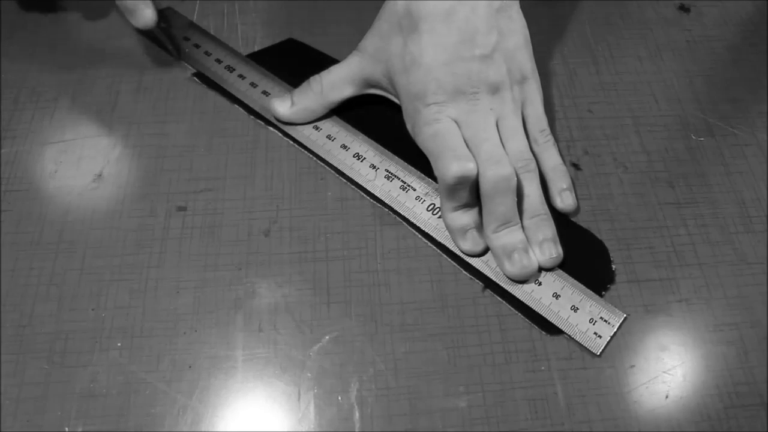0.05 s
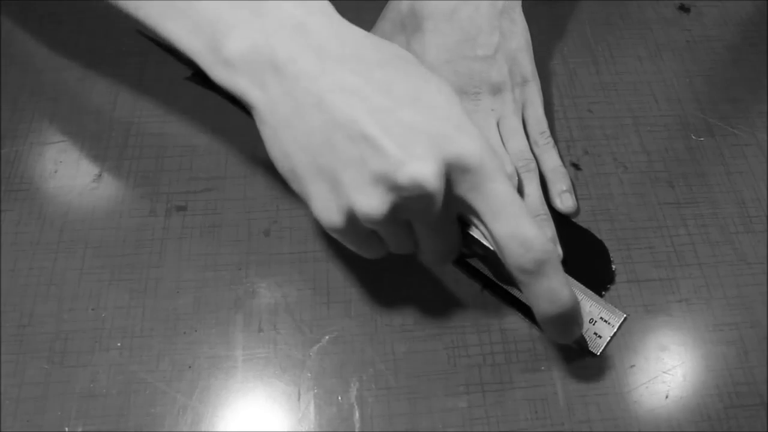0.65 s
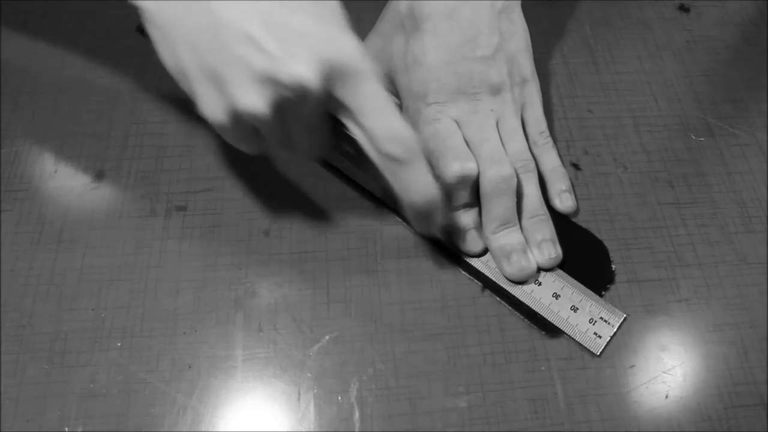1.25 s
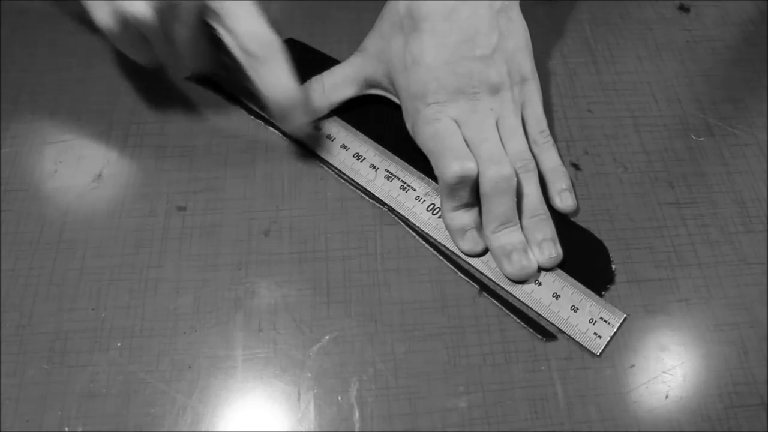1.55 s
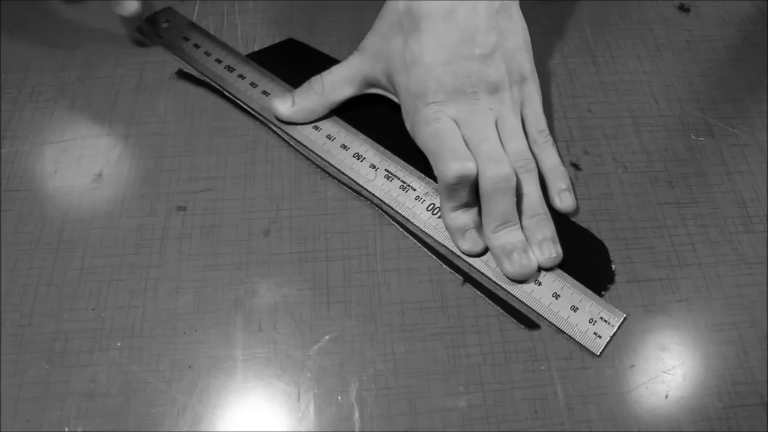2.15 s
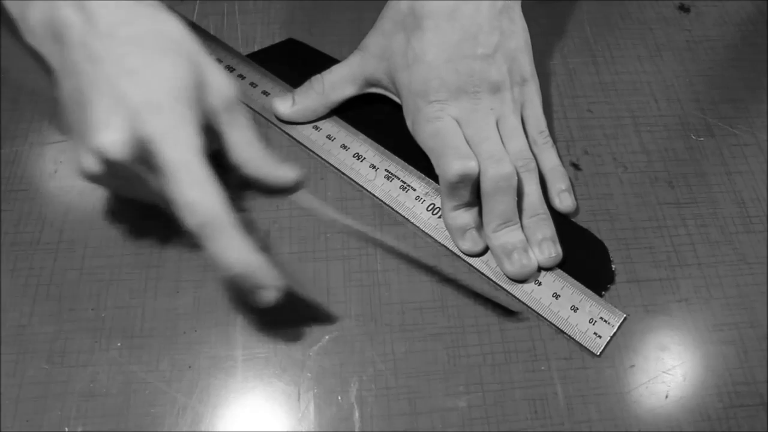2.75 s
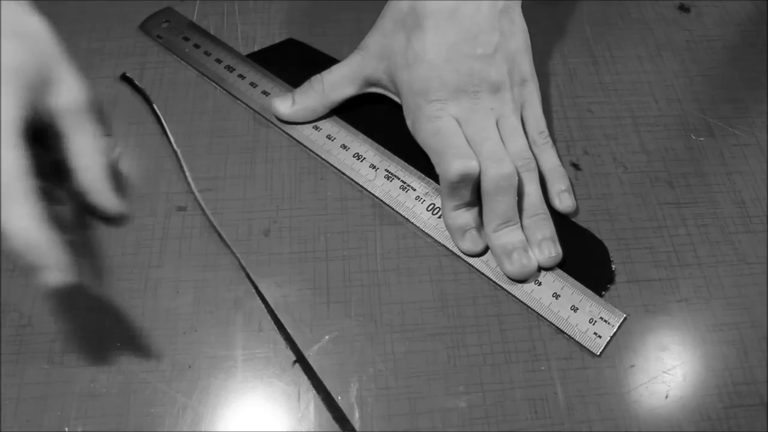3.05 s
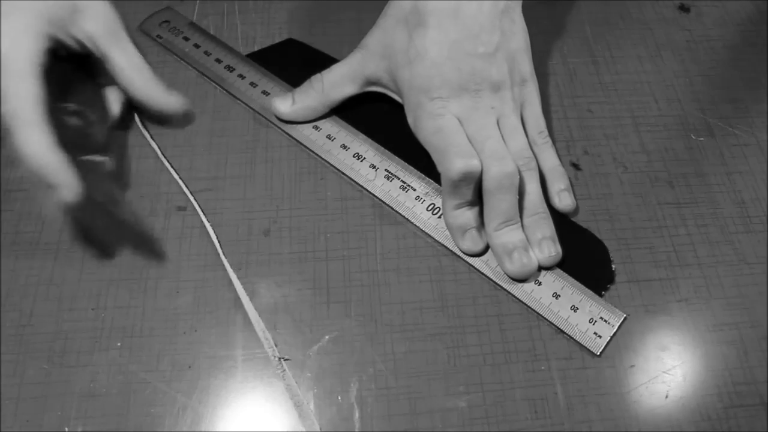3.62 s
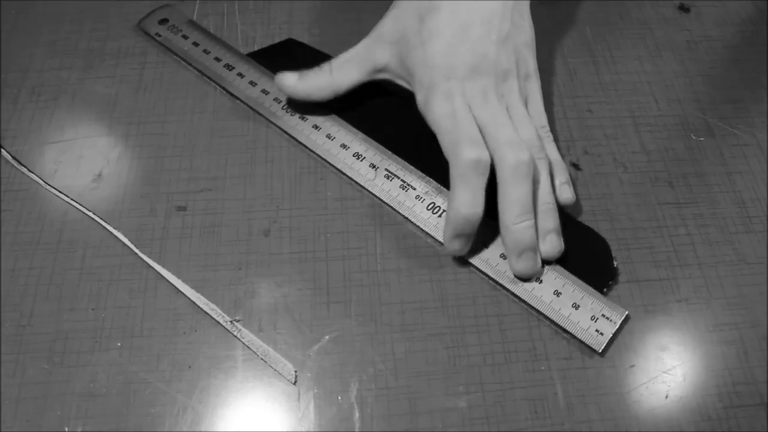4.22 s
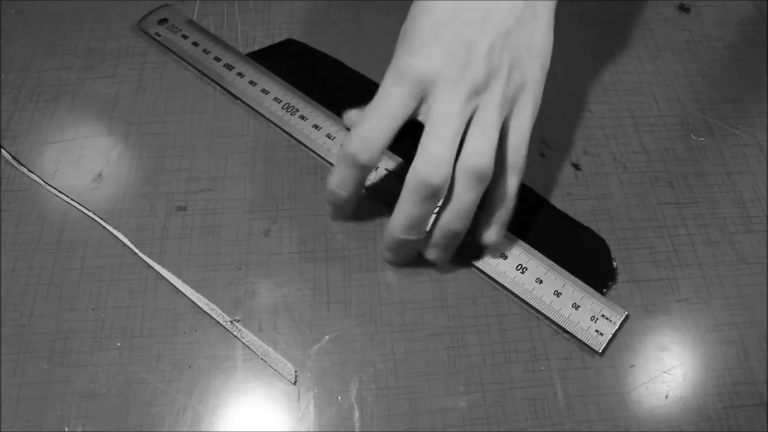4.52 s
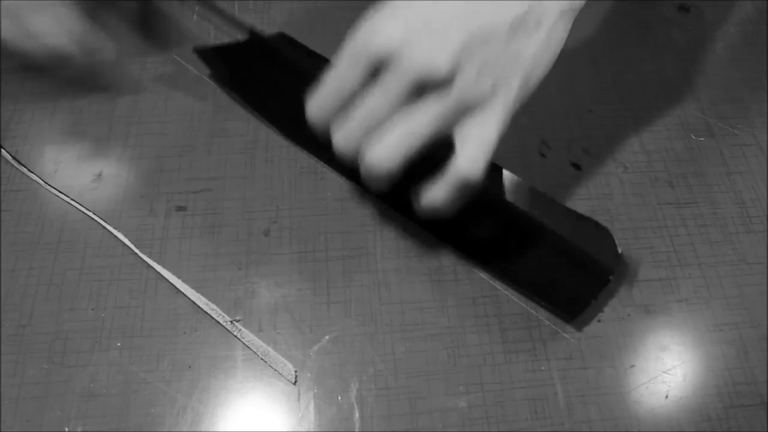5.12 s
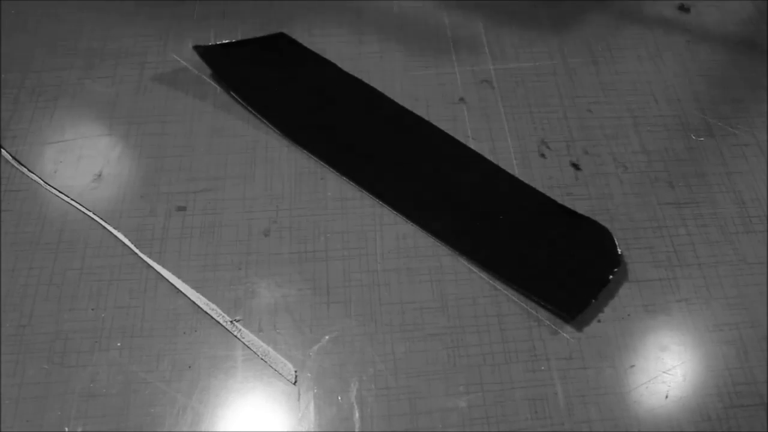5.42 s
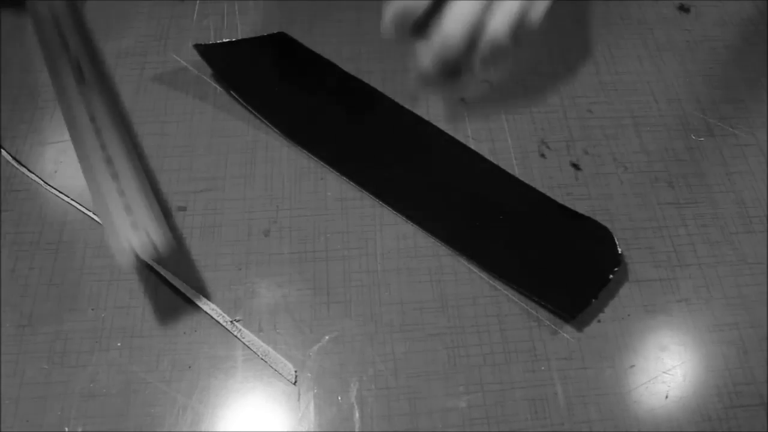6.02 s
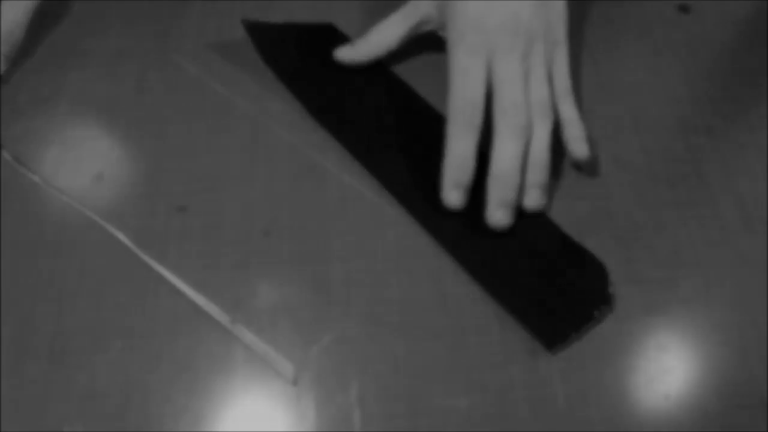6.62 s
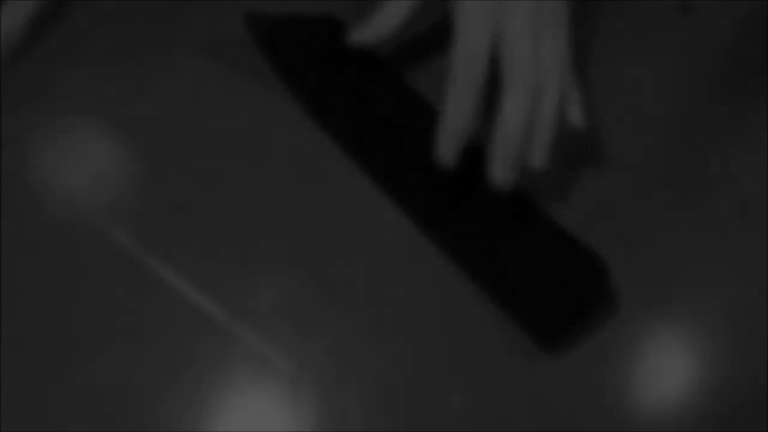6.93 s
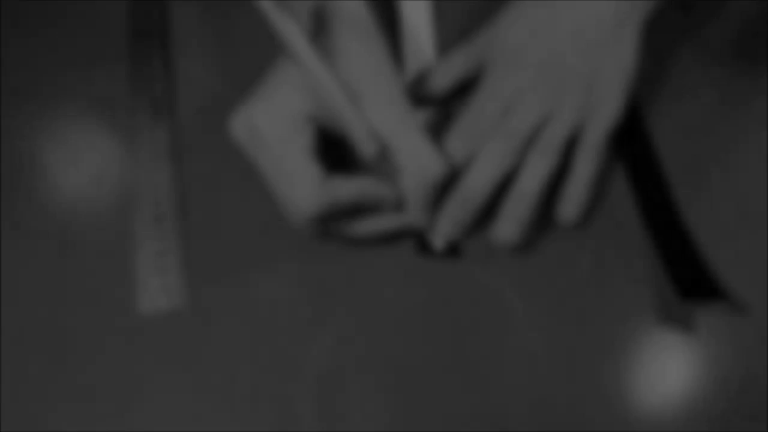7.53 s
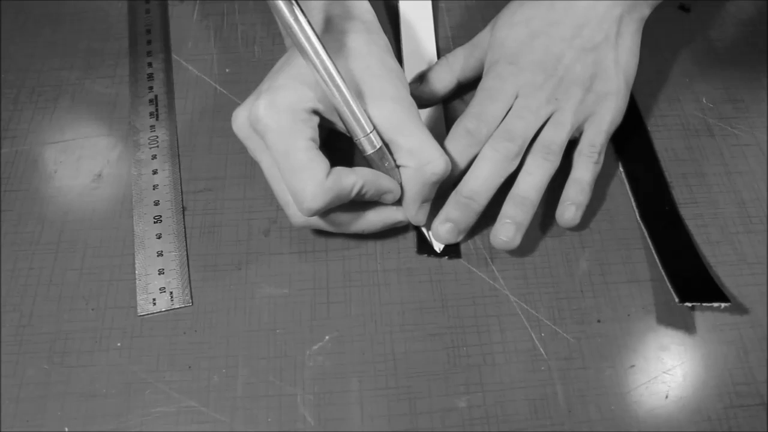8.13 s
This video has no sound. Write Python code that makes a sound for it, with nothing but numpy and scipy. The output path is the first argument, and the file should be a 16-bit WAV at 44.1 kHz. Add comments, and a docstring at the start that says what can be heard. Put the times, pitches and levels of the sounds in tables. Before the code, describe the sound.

A knife tip is set down and drawn through leather, scraping along a steel ruler with a few sharp clicks. The ruler gets a knock, an offcut swishes aside and hands tap the table. Then the ruler rattles, scrapes and rings as it is picked up, and clatters down again. Soft leather slides finish the action. The sounds are close, with a small room's short echo.

```python
"""Cutting leather along a steel ruler

In a small, lively room a craft knife rasps through leather and sings on the ruler's edge. Knife and
hands knock on the table; the ruler is picked up ringing, dragged away and laid down with a clatter;
then leather slides over the table top. Cuts and slides are streams of tiny slips; blows are bursts
of tiny touches that ring the modes of table, blade and ruler."""
import sys
import numpy as np
from scipy import signal
from scipy.fft import rfft, irfft
from scipy.io import wavfile
from scipy.ndimage import uniform_filter1d

SR = 44100
rng = np.random.default_rng(int(sys.argv[2]) if len(sys.argv) > 2 else 0)


def bounce(signal):
    """Save signal as a 16-bit WAV file at the path given by the first command-line argument."""
    frames = np.transpose(np.atleast_2d(signal))
    limited = np.clip(frames, -1, 1)
    pcm = np.round(limited * 32767).astype(np.int16)
    wavfile.write(sys.argv[1], SR, pcm)


N = 369103
TIME = np.arange(N) / SR
RING_TIME = TIME[:SR * 3 // 4]


def undb(db):
    """Decibels to gain."""
    return 10 ** (np.asarray(db) / 20)


def unit(x):
    """Scale to rms 1."""
    return x / np.sqrt(np.mean(x ** 2))


def blow(x, db, length_s=.04):
    """Give a short sound the energy of length_s seconds at this level."""
    return x * undb(db) * np.sqrt(length_s * SR / np.sum(x ** 2))


def add(out, s, x):
    """Mix x into out from second s on."""
    i = max(int(s * SR), 0)
    out[i:i + len(x)] += x[:len(out) - i]


def convolve(x, response):
    """Pass x through a response, keeping its length."""
    return signal.fftconvolve(x, response)[:len(x)]


def on_log_axis(hz, points_hz, values):
    """Join points by straight lines over log frequency."""
    return np.interp(np.log(np.maximum(hz, 1)), np.log(points_hz), values)


def colour(points, size=2048):
    """Causal response with an (Hz, dB) spectrum, from the folded cepstrum; energy 1."""
    curve_db = on_log_axis(np.fft.rfftfreq(size, 1 / SR), *np.transpose(points))
    cepstrum = np.fft.irfft(np.log(undb(curve_db)))
    cepstrum[1:size // 2] *= 2
    cepstrum[size // 2 + 1:] = 0
    response = irfft(np.exp(rfft(cepstrum)))
    return response / np.linalg.norm(response)


def split(x, hz):
    """The parts of x below and above a frequency."""
    return [signal.sosfilt(signal.butter(4, hz, kind, fs=SR, output="sos"), x + 1e-18)
            for kind in ("low", "high")]


def ring(modes, tilt_db=0):
    """Damped sines of (Hz, dB, t60) modes, tilted per octave; neighbours alternate in sign; energy 1."""
    x = np.zeros(len(RING_TIME))
    for k, (hz, db, t60) in enumerate(modes):
        gain = (-1) ** k * undb(db + tilt_db * np.log2(hz))
        x += gain * np.sin(2 * np.pi * hz * RING_TIME) * np.exp(-np.log(1000) * RING_TIME / t60)
    return x / np.linalg.norm(x)


def contact(points, *rings):
    """One touch: a click of this colour, followed by the rings of what was touched."""
    x = sum(rings, np.zeros(len(RING_TIME)))
    add(x, 0, colour(points))
    return x


def burst(decay_s, rate=9000):
    """A contact is many tiny touches that die away; energy 1."""
    n = len(RING_TIME)
    touches = (rng.random(n) < rate / SR) * rng.standard_normal(n) * np.exp(-RING_TIME / decay_s)
    touches[0] += 1
    # flatten the spectrum, so that the struck object sets the colour
    spectrum = rfft(touches)
    smooth_power = uniform_filter1d(np.abs(spectrum) ** 2, size=150)
    flat = irfft(spectrum / np.sqrt(smooth_power + 1e-9), n)[:SR // 4]
    return flat / np.linalg.norm(flat)


def strike(touch, thump_db, knock_db, tick_db, thump_hz=380, tick_hz=3600):
    """A blow's weight sets the thump, its speed the knock and its hardness the tick."""
    low, rest = split(touch, thump_hz)
    middle, high = split(rest, tick_hz)
    return blow(low, thump_db) + blow(middle, knock_db) + blow(high, tick_db)


def walk(rate):
    """Random levels held 1 / rate s and slewed; rms 1."""
    hold = int(SR / rate)
    steps = np.repeat(rng.standard_normal(N // hold + 1), hold)
    return unit(uniform_filter1d(steps, hold)[:N])


def friction(gains, touch, rate, spread_db, judder_db, split_hz, held=None, wander=.022):
    """Tiny slips of uneven size sound the touch; a low and a high gain give pressure and bite."""
    slips = (rng.random(N) < rate / SR) * rng.choice([-1., 1.], N)
    slips *= undb(spread_db * np.minimum(rng.exponential(size=N), 4))
    slips *= undb(judder_db * walk(90))
    grains = convolve(slips, touch)
    if held is not None:  # a held tool's resonances wander with grip and angle
        position = np.cumsum(1 + wander * walk(14))
        grains += np.interp(position, np.arange(N), convolve(slips, held))
    return sum(unit(part) * gain for part, gain in zip(split(grains, split_hz), gains))


def stroke(s, length_s, attack_s, release_s):
    """Gain of one movement: it builds up, holds to the end of its length and dies away."""
    attack = np.clip((TIME - s) / attack_s, 0, 1)
    return attack * np.exp(-np.maximum(TIME - s - length_s, 0) / release_s)


def strokes(rows, attack_s, release_s):
    """Low and high gains of (s, length s, low dB, high dB) movements with one attack and release."""
    return sum(undb(levels)[:, None] * stroke(s, length_s, attack_s, release_s)
               for s, length_s, *levels in rows)


# EQ of the room tone. Each row: frequency in Hz, gain in dB.
ROOM_TONE_EQ = [(15, -63), (25, -31), (200, -6), (291, -10.5), (342, -8.5), (382, -8.5), (1180, -12),
                (1870, -14.5), (2590, -15.5), (3050, -17.5), (6660, -20), (15800, -31)]


def room_tone(level_db=-57.5, drift_db=0.57):
    """A faint bed of dark noise whose level drifts a little."""
    bed = unit(convolve(rng.standard_normal(N), colour(ROOM_TONE_EQ)))
    return bed * undb(level_db + drift_db * walk(2.4))


# The small room's reverb. Each row: frequency in Hz, relative wet level in dB, t60 in seconds.
REVERB_BANDS = [(60, -9.5, 0.14), (120, 5, 0.41), (166, -9.5, 0.18), (220, 4, 0.26), (320.6, 3, 0.26),
                (991, 3.5, 0.29), (2930, -2, 0.31), (7000, -3.5, 0.3), (15000, -5.5, 0.18)]


def room(x, send_db=0, build_s=.0025, size=768):
    """Direct sound plus a dense tail from near walls, which dies sooner in the top treble."""
    hz, s, noise = signal.stft(rng.standard_normal(len(RING_TIME)), SR, nperseg=size)
    points_hz, *columns = np.transpose(REVERB_BANDS)
    wet_db, t60 = (on_log_axis(hz, points_hz, c)[:, None] for c in columns)
    fade = np.log(1000) / t60
    decaying = noise * undb(wet_db) * np.sqrt(2 * fade / SR) * np.exp(-fade * s)
    tail = signal.istft(decaying, SR, nperseg=size)[1][:len(RING_TIME)]
    return x + undb(send_db) * convolve(x, tail * (1 - np.exp(-RING_TIME / build_s)))


# The table top's body. Each row: frequency in Hz, relative level in dB, t60 in seconds.
TABLE_MODES = [(232, -4, 0.11), (430, -13, 0.13), (705, 0.5, 0.19), (950, -4.5, 0.3), (1065, 4, 0.17),
               (1103, 0.5, 0.33), (1217, -10.5, 0.16), (1358, -2, 0.3), (1424, -0.5, 0.22),
               (1577, 1.5, 0.34), (1867, -18.5, 0.22), (2192, -5, 0.1494)]


def table_top():
    """The work table rings under whatever knocks or scrapes on it."""
    return ring(TABLE_MODES)


# Leather and hands sliding, and the offcut swept aside.
# Each row: start in seconds, length in seconds, low rub in dB, high hiss in dB.
SLIDES = [(6.01, 0.078, -53, -75), (6.225, 0.065, -53.5, -55), (6.332, 0.018, -41, -47),
          (6.39, .12, -47.5, -52.5), (7.12, 0.11, -39, -40.5), (7.25, 0.21, -44, -41),
          (7.52, 0.03, -42.5, -39.5), (7.6, 0.28, -55.5, -54.5), (7.815, 0.066, -52, -39),
          (7.92, 0.054, -52, -68)]
OFFCUT_SWEEPS = [(2.73, 0.075, -46, -39), (2.845, 0.02, -52, -48)]
# EQ of the slide and of the sweep. Each row: frequency in Hz, gain in dB.
SLIDE_EQ = [(24, -39), (40, -54), (129, -4.5), (377, -3.5), (417, 0), (653, -4.5), (973, -6), (1350, -4.5),
            (1450, -5.5), (7520, -13.5), (15500, -23.5)]
SWEEP_EQ = [(300, -32), (3000, -4), (8500, -8), (11000, -4), (14000, 0), (16000, -6)]


def leather():
    """Leather and palms brush over the table with a fine, smooth grain; the thin offcut swishes higher."""
    brush = friction(strokes(SLIDES, attack_s=0.013, release_s=0.031), colour(SLIDE_EQ),
                     rate=9000, spread_db=3.0, judder_db=0.1, split_hz=3720)
    swish = friction(strokes(OFFCUT_SWEEPS, attack_s=0.016, release_s=.015), colour(SWEEP_EQ),
                     rate=6000, spread_db=4.0, judder_db=4.0, split_hz=7900)
    return undb(-3.0) * brush + swish


# Hands and knife handle hitting the table. Each row: start in seconds, then thump, knock and tick in dB.
KNOCKS = [(0.0, -55, -35, -47.5), (.271, -46.5, -40, -50.5), (.487, -44, -42, -65),
          (3.004, -36.5, -32.5, -31.5), (3.323, -41.5, -36, -43), (3.456, -69, -62, -57),
          (3.816, -39, -33.5, -41.5), (3.943, -43.5, -42.5, -62), (3.965, -40.5, -53, -51),
          (4.099, -45, -46.5, -82), (7.784, -43, -53, -76), (8.124, -39, -38, -74)]
# EQ of a knock. Each row: frequency in Hz, gain in dB.
KNOCK_EQ = [(30, -15), (96, 3), (160, -9), (230, -1.5), (330, -7), (430, 0), (550, -0.5), (950, 4.5),
            (1300, 6.5), (1700, 2), (2400, -1.5), (3300, -16.5), (5500, -32), (15500, -51)]
# Palms pressing on the table. Each row: start in seconds, level in dB.
PALM_PATS = [(0.203, -48.5), (6.385, -49), (7.381, -47), (7.538, -40.5)]


def knocks(table, contact_s=0.0035, pat_hz=118, pat_s=0.005):
    """Knuckles and tools knock on the table; soft palms only stir one low note."""
    out = np.zeros(N)
    touch = contact(KNOCK_EQ, undb(-14.0) * table)
    for s, *levels in KNOCKS:
        add(out, s, strike(convolve(touch, burst(contact_s)), *levels))
    pat = np.sin(2 * np.pi * pat_hz * RING_TIME) * RING_TIME * np.exp(-RING_TIME / pat_s)
    for s, db in PALM_PATS:
        add(out, s, blow(pat, db))
    return out


# The steel ruler ringing freely. Each row: frequency in Hz, relative level in dB, t60 in seconds.
RULER_MODES = [(1010, -4.5, 1.1), (2575, -4.5, 0.36), (2924, -10, .3), (3586, -1, 0.46), (4680, -7, 0.59),
               (5788, 0.5, 0.41), (6900, -3.5, .42), (8380, -0.5, 0.3), (9050, -5, .36), (9350, -11, 0.4),
               (10900, -9, .28), (11030, -9.5, .26), (12440, -11, .3), (13100, -7.5, .29),
               (14070, -14, 0.26), (15100, -11.5, .25)]
# Blows on the ruler. Each row: start in seconds, then thump, knock, tick and ring in dB,
# centre of the ring in Hz, multiplier on the free ring time.
RULER_HITS = [(0.6817, -30.5, -19.5, -47, -34.5, 1100, 0.26), (2.6766, -27, -15, -28, -25.5, 2880, 0.54),
              (4.301, -69, -73, -53, -56.5, 7360, 0.99), (4.357, -71, -74, -61.5, -55, 5000, .9),
              (4.587, -52, -43.5, -28.5, -39.5, 3980, .5), (4.603, -29.5, -14.5, -30.5, -20, 3560, 0.69),
              (4.650, -41, -15.5, -19.5, -20, 4120, 0.74), (4.663, -44, -15, -25.5, -34, 5480, .6),
              (4.894, -50, -28.5, -45, -42.5, 4000, .5), (4.923, -58.5, -35, -33.5, -44, 6500, 0.55),
              (4.952, -28.5, -24, -11.5, -7, 6400, 1.05), (4.992, -61.5, -28.5, -28.5, -17.5, 6980, .6)]


def ruler_ringing(focus_db_per_octave=11, deepest_cut_db=18, pair_hz=14, twin_db=-14):
    """Harder blows favour higher modes; lying on the leather shortens the ring; close mode pairs beat."""
    out = np.zeros(N)
    for s, _, _, _, ring_db, centre_hz, sustain in RULER_HITS:
        modes = []
        for hz, db, t60 in RULER_MODES:
            cut_db = min(focus_db_per_octave * abs(np.log2(hz / centre_hz)), deepest_cut_db)
            modes.append((hz, db - cut_db, t60 * sustain))
        twins = [(hz + pair_hz * rng.uniform(-2.2, 3.4), db + twin_db, t60) for hz, db, t60 in modes]
        add(out, s, blow(ring(modes + twins), ring_db))
    return out


# The ruler's end dragging. Each row: start in seconds, length in seconds, rasp in dB, hiss in dB.
SCRAPES = [(4.675, 0.045, -16, -38), (4.818, 0.03, -32.5, -58), (4.92, 0.081, -30, -33.5),
           (4.995, .11, -22, -19.5)]
# EQ of the steel's slap and of its scrape. Each row: frequency in Hz, gain in dB.
SLAP_EQ = [(24, -57), (40, -25), (333, -12.5), (535, -4), (1080, 1.5), (1190, 2), (1560, 1.5),
           (3390, -15.5), (3650, -12.5), (4920, -26), (5860, -15), (6320, -25), (7160, -20), (8310, -24),
           (15500, -36)]
SCRAPE_EQ = [(40, -21.5), (150, -9.5), (500, -7), (1100, 6), (2400, 4.5), (4500, -8.5), (9000, -21.5),
             (16000, -37)]


def ruler_handled(table, contact_s=0.0027):
    """Jolted and prised up, the ruler slaps the table; its end scrapes as it is pulled away."""
    out = np.zeros(N)
    slap = contact(SLAP_EQ, undb(-9.5) * table)
    for s, thump_db, knock_db, tick_db, *_ in RULER_HITS:
        add(out, s, strike(convolve(slap, burst(contact_s)), thump_db, knock_db, tick_db))
    edge = contact(SCRAPE_EQ, undb(-15.5) * ring(RULER_MODES, tilt_db=0.5), undb(-13.0) * table)
    return out + friction(strokes(SCRAPES, attack_s=.02, release_s=0.01), edge,
                          rate=3000, spread_db=4.0, judder_db=0.0, split_hz=5340)


# The ruler falling flat. Each row: start in seconds, then thump, knock and tick in dB,
# chatter decay in seconds, snap pitch in Hz.
LANDINGS = [(6.334, -47, -52, -51, 0.03, 3740), (6.526, -32, -19, -21.5, 0.015, 1670),
            (6.634, -40, -24.5, -27, 0.014, 1360), (6.642, -39, -18.5, -23, 0.0058, 4000),
            (6.769, -39, -31.5, -43.5, 0.017, 4680), (6.894, -40.5, -26.5, -39.5, 0.05, 1450),
            (6.917, -32.5, -15.5, -15, 0.064, 7160), (7, -30, -17, -12.5, 0.0043, 3600),
            (7.01, -53, -18.5, -40, 0.026, 1450)]
# EQ of a landing. Each row: frequency in Hz, gain in dB.
LANDING_EQ = [(24, -57), (40, -53), (114, -4), (183, -14.5), (218, -2), (317, -14), (397, -1.5), (438, -13),
              (1520, -0.5), (1910, -4), (7160, -8), (14000, -16.5), (15500, -33)]


def ruler_dropped(table, landing_s=0.0049, chatter_db=-3.0, snap_db=-10, snap_t60_s=.008):
    """The ruler lands flat and chatters; each landing snaps at the pitch of the length left free."""
    out = np.zeros(N)
    steel = undb(-27) * ring(RULER_MODES[4:], tilt_db=-4.0)
    for s, *levels, chatter_s, snap_hz in LANDINGS:
        snap = undb(snap_db) * ring([(snap_hz, 0, snap_t60_s)])
        touch = contact(LANDING_EQ, undb(-28.0) * table, steel, snap)
        landing = np.exp(-chatter_s / 0.055) * burst(landing_s)  # gentler before a long chatter
        chatter = undb(chatter_db) * burst(chatter_s, rate=900)
        add(out, s, strike(convolve(touch, landing + chatter), *levels))
    return out


# The hand's pressure, surging along the cut. Each row: time in seconds, pressure as a level in dB.
CUT_PRESSURE = [(0.92, -49), (0.968, -46), (0.986, -34), (1.25, -17.5), (1.418, -27), (1.534, -15),
                (1.636, -16.5), (1.674, -21.5), (1.684, -17), (1.852, -27), (2.002, -17.5), (2.114, -29),
                (2.156, -20), (2.175, -33.5)]


def cutting_gains(full_db=-16.5, fade_s=0.0072, hiss_growth=1.6, buzz_growth=2.26, sag_db_per_s=29):
    """Pressed harder, the blade bites brighter; leaning on the steel adds hiss, buzz and sizzle."""
    s, db = np.transpose(CUT_PRESSURE)
    pressure = undb(np.interp(TIME, s, db) - full_db) * stroke(s[0], s[-1] - s[0], fade_s, fade_s)
    lean_s, length_s, release_s = 1.125, 0.62, 0.086
    lean = stroke(lean_s, length_s, attack_s=0.035, release_s=release_s)
    rasp = undb(full_db - 1.5) * pressure
    hiss = undb(-22 + 4.5 * lean) * pressure ** hiss_growth
    sag_db = sag_db_per_s * np.maximum(TIME - lean_s, 0)
    buzz = undb(-11.5 - sag_db) * lean * pressure ** buzz_growth
    sizzle = undb(-39.5) * stroke(lean_s, length_s, attack_s=0.173, release_s=release_s)
    return (rasp, hiss), (buzz, sizzle)


# The knife's voices: blade and handle, the blade singing on steel, the tip's hollow tock on leather.
# Each row: frequency in Hz, relative level in dB, t60 in seconds.
BLADE_MODES = [(801, 2, 0.033), (1110, 0, 0.047), (1510, 2.5, 0.022), (2775, -2, 0.048), (3680, -2, 0.02),
               (6996, -3.5, 0.024), (8720, -7, 0.017), (9320, -4, 0.014), (11120, -7, 0.0067),
               (14100, 0, .003)]
SINGING_MODES = [(2743, 3, 0.025), (14100, 4, .003), (15200, 0.0085, 0.0035)]
TIP_MODES = [(761, 1.5, 0.041), (1516, -2.5, 0.037), (2645, -2.5, 0.027)]
# EQ of tearing fibres. Each row: frequency in Hz, gain in dB.
TEAR_EQ = [(30, -46), (70, -19), (130, -25), (240, -9.5), (320, -13), (570, 0), (850, -3.5), (1100, 6.5),
           (1450, 1), (2300, -7), (2900, -8), (5200, -15), (8700, -19), (15500, -37.5)]
# The blade catching on the ruler. Each row: start in seconds, level in dB, tilt in dB per octave.
CATCHES = [(.807, -28.5, 6.5), (.98, -41, -5.5), (1.006, -37, -1.5), (1.228, -17, 4), (1.6849, -14.5, 1),
           (1.715, -29, 5), (1.942, -24.5, 1.5), (2.013, -21.5, -5.5), (2.151, -26, -0.5), (2.195, -43, -5)]


def knife(table, tip_down_s=.8075, catch_s=0.00059):
    """The tip is set down; the blade tears fibres and grates on the steel edge, singing and catching."""
    blade = undb(-3.5) * ring(BLADE_MODES)
    tearing, singing = cutting_gains()
    fibre = contact(TEAR_EQ, undb(-4.5) * table)
    out = friction(tearing, fibre, rate=1700, spread_db=2.5, judder_db=1.5, split_hz=2160, held=blade)
    out += friction(singing, ring(SINGING_MODES), rate=4100, spread_db=3.5, judder_db=-1.5, split_hz=7700)
    add(out, tip_down_s, blow(ring(TIP_MODES), db=-25))
    for s, db, tilt_db in CATCHES:
        tilted_eq = [(hz, level + tilt_db * np.log2(hz)) for hz, level in TEAR_EQ]
        click = contact(tilted_eq, undb(-3) * ring(BLADE_MODES, tilt_db))
        add(out, s, blow(convolve(click, burst(catch_s)), db))
    return split(out, hz=69)[1]  # the knife's sounds carry no deep bass


def scene(carried_s=5.1, carried_db_per_s=120):
    """Each source has its own echoes; the ruler's ring gets less reverb, so its pitches stay clear."""
    table = table_top()
    sources = [knocks(table), knife(table), ruler_handled(table), ruler_dropped(table), leather()]
    work = undb(-5.0) * split(sum(room(x) for x in sources), hz=42)[1]
    # the ring drops by 6 dB as the ruler is carried away
    carried_db = np.clip(carried_db_per_s * (carried_s - TIME), -6, 0)
    steel = room(ruler_ringing() * undb(carried_db - 2.0), send_db=-5)
    return (work + steel + room_tone())[None]


def record(dry, top_hz=16000):
    """Peaks clip at full scale, and a steep low-pass cuts the top."""
    low_pass = signal.ellip(10, .2, 70, top_hz, fs=SR, output="sos")
    return signal.sosfilt(low_pass, np.clip(dry, -1, 1))


dry = scene()
out = record(dry)
bounce(out)
```